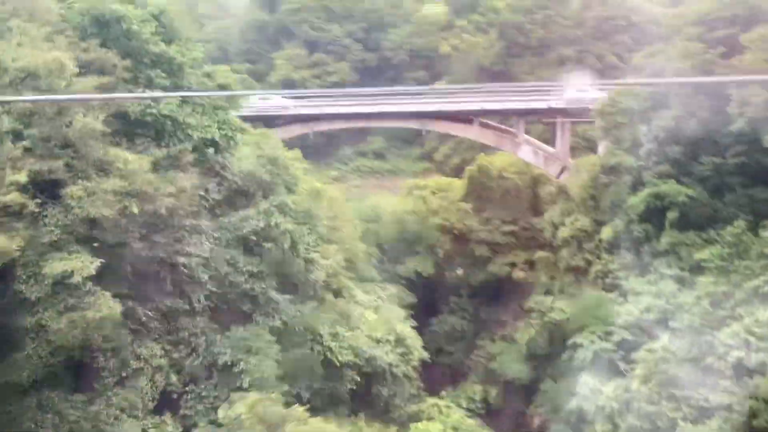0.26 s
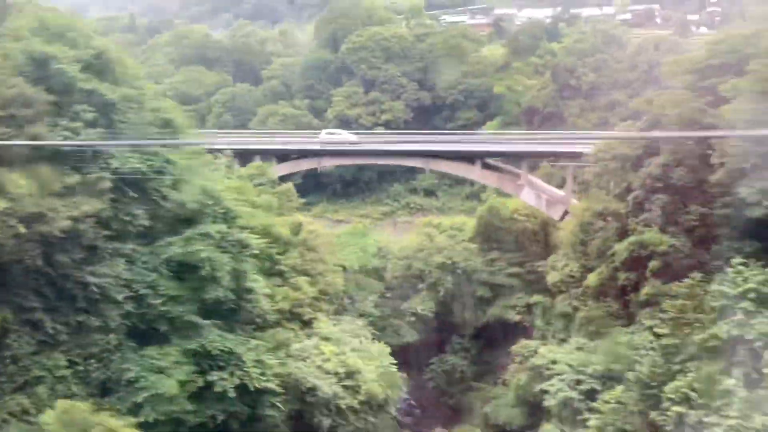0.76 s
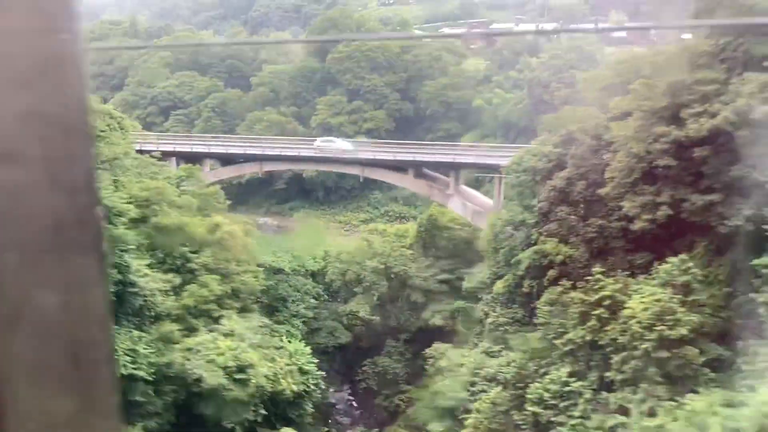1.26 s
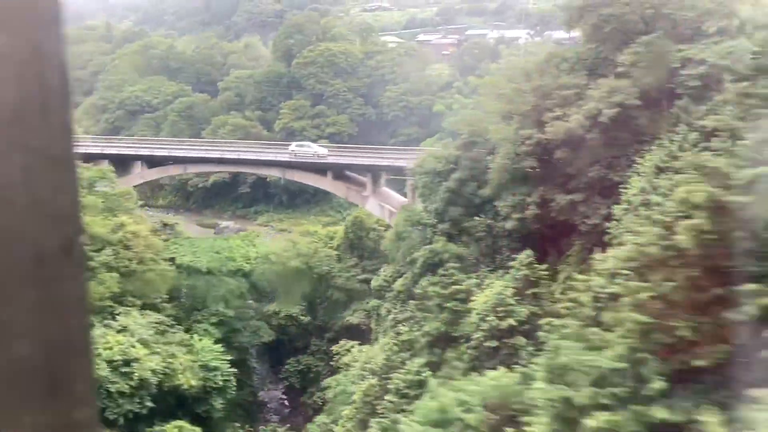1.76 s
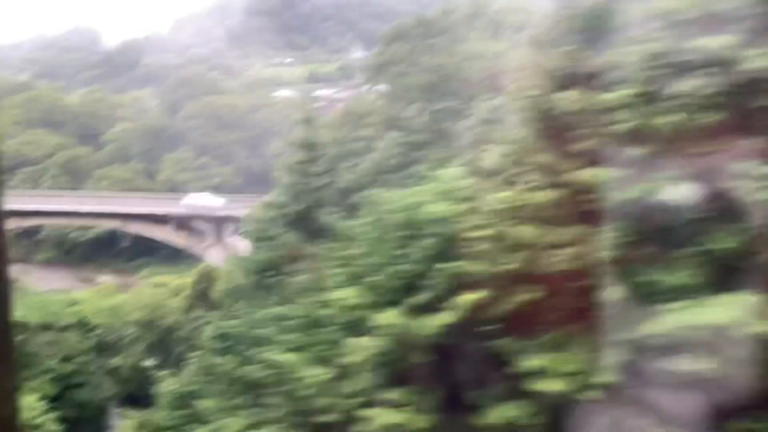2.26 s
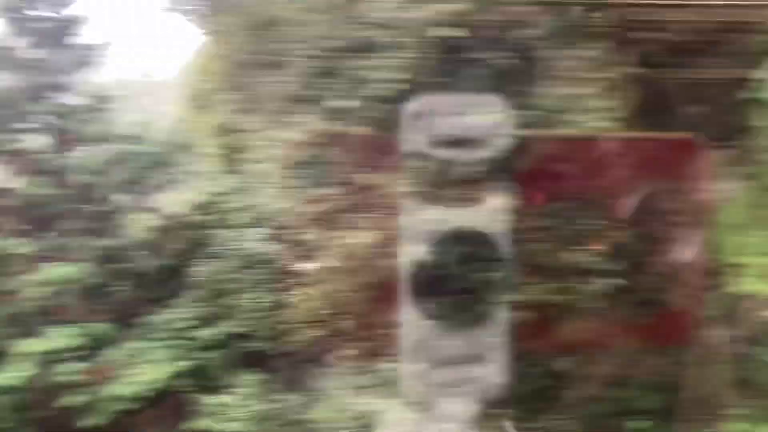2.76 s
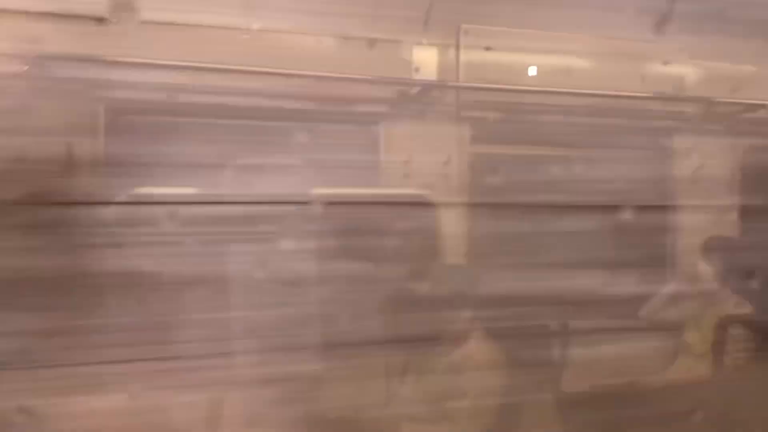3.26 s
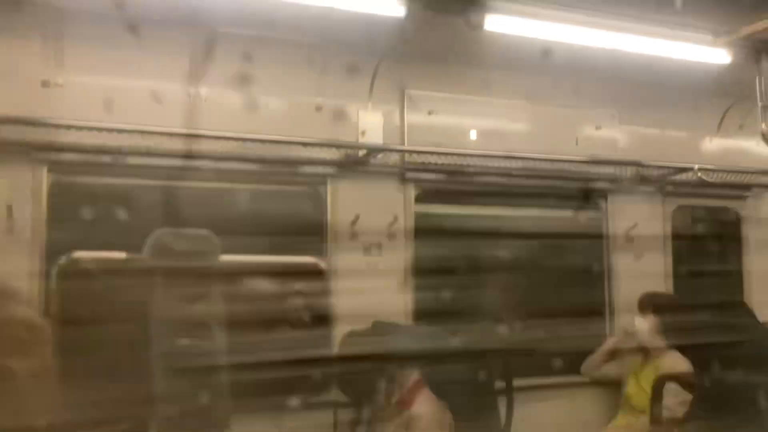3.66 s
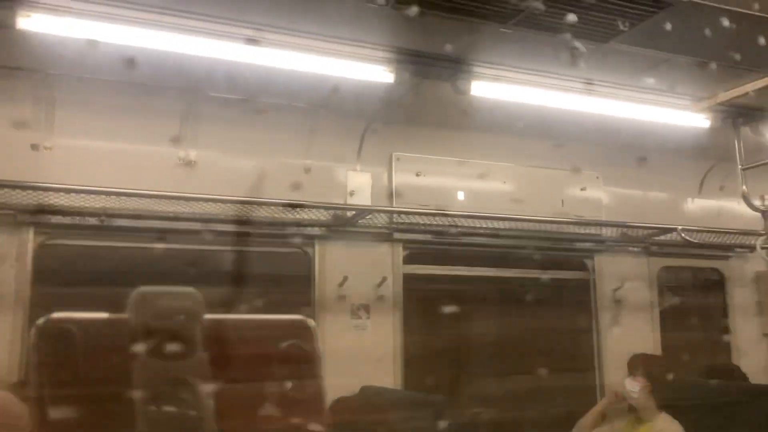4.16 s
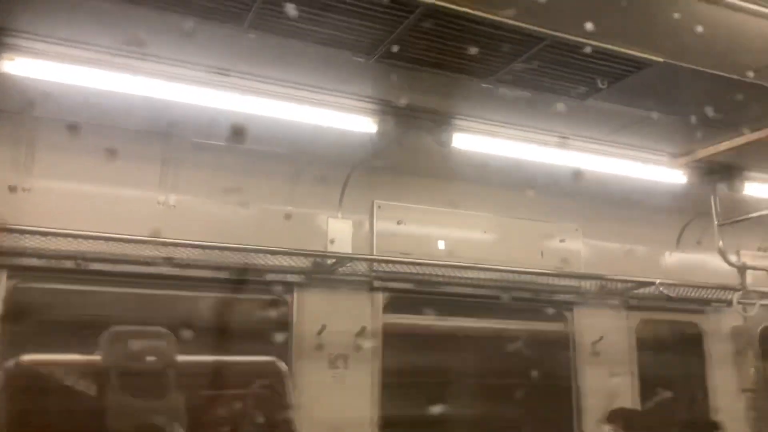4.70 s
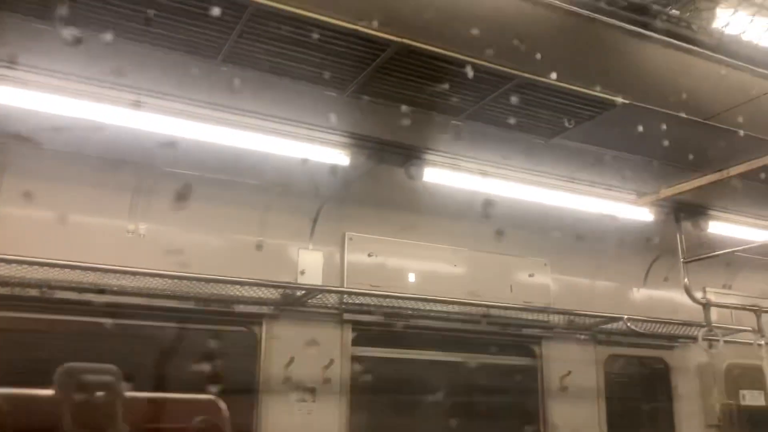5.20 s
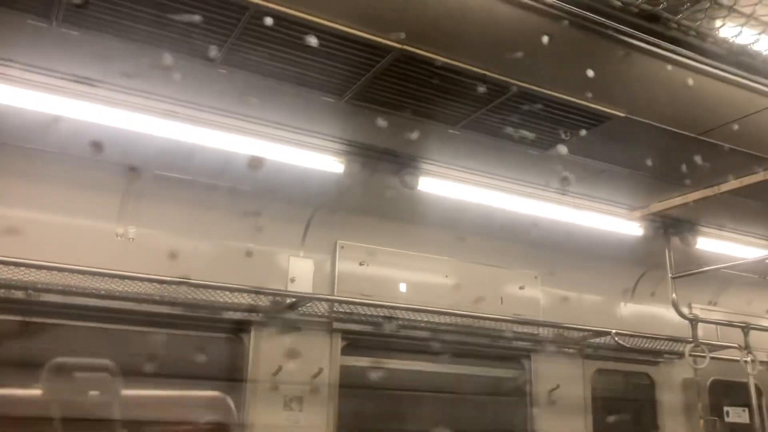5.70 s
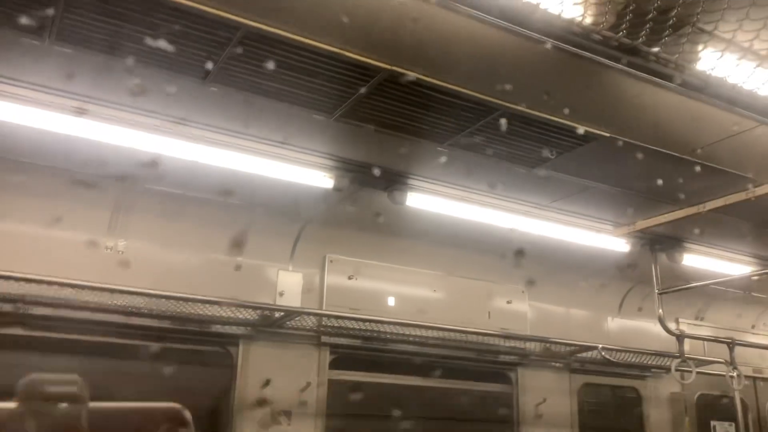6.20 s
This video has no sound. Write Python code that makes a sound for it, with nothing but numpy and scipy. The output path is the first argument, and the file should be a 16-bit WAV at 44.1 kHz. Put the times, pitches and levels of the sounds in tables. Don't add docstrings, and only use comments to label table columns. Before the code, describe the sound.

Inside a moving electric train, a deep rumbling floor and paired rail-joint thuds turn abruptly louder as a tunnel closes around the car.

```python
import sys
import numpy as np
from scipy import signal
from scipy.fft import rfft, irfft, next_fast_len
from scipy.io import wavfile
from scipy.ndimage import uniform_filter1d

SR = 44100
rng = np.random.default_rng(int(sys.argv[2]) if len(sys.argv) > 2 else 0)


def invert_db(level):
    return 10 ** (np.asarray(level, dtype=float) / 20)


def waveform_to_disk(signal):
    frames = np.transpose(np.atleast_2d(signal))
    scaled = np.clip(frames, -1, 1) * 32767
    samples = np.round(scaled).astype(np.int16)
    wavfile.write(sys.argv[1], SR, samples)


N = 284004
STEP = 32
CONTROL_S = np.arange(0, N + STEP, STEP) / SR


def rms_one(x):
    return x / np.sqrt(np.mean(x ** 2) + 1e-20)


def at_hz(points, hz):
    point_hz, values = np.array(points)[:, :2].T
    return np.interp(np.log(hz), np.log(point_hz), values)


def full(control):
    return np.interp(np.arange(N) / STEP, np.arange(len(control)), control)


def drift(rate_hz):
    r = np.exp(-2 * np.pi * STEP * rate_hz / SR)
    chance = rng.standard_normal(len(CONTROL_S) + 2000)
    return rms_one(signal.lfilter([1], [1, -2 * r, r * r], chance)[2000:])


def resonate(x, hz, width_hz):
    r = np.exp(-np.pi * width_hz / SR)
    poles = [1, -2 * r * np.cos(2 * np.pi * hz / SR), r * r]
    return signal.lfilter(np.array([1, 0, -1]) * (1 - r * r) / 2, poles, x)


def swell(t, rise, t60):
    shape = (1 - np.exp(-t / max(rise, 1e-4))) * invert_db(-60 * t / max(t60, 0.005))
    return shape / shape.max()


def bell(t, rise, sharp):
    return (t / rise * np.exp(1 - t / rise)) ** sharp


def add(track, start, piece):
    i = round(start)
    track[..., i:i + piece.shape[-1]] += piece[..., :track.shape[-1] - i]


def sides(pan_db):
    return invert_db(np.array([[pan_db / 2], [-pan_db / 2]]))


def evened(x, span_s):
    power = uniform_filter1d(np.mean(np.atleast_2d(x) ** 2, axis=0), size=int(span_s * SR))
    return x * np.sqrt(np.mean(power) / (power + 0.087 * np.mean(power)))


# time in seconds, force level in dB.
WHEEL_FORCE = [(0.0, -34.5), (0.7, -37.5), (0.8, -34.5), (1.36, -35.5), (1.63, -34.5), (2.05, -34.5),
               (2.26, -36.5), (2.32, -29.5), (2.66, -35.5), (2.8, -33), (2.97, -24), (3.09, -27),
               (3.25, -28.5), (3.7, -26), (4.5, -25.5), (4.68, -33), (5.3, -30), (6.44, -34)]


def force_db():
    mean_db = -33
    return np.interp(CONTROL_S, *np.transpose(WHEEL_FORCE)) - mean_db


def enclosed():
    portal_s, portal_width_s = 2.94, 0.11
    return (1 + np.tanh((CONTROL_S - portal_s) / portal_width_s)) / 2


# time of the top in seconds, peak in dB, fall in seconds per 10 dB.
BUMPS = [(0.0, -13.5, 0.11), (0.3, -21, 0.09), (0.52, -24.5, 0.5), (0.43, -31, -0.35), (0.77, -17, -0.03),
         (0.93, -20.5, 0.16), (1.05, -15.5, 0.06), (1.36, -21.5, 0.22), (1.61, -18.5, 0.21),
         (1.789, -17, -0.08), (2.04, -17.5, 0.13), (2.16, -33, -0.8), (2.32, -32, -0.6), (2.5, -19.5, .06),
         (1.92, -23, -0.07), (2.89, -24, 0.65), (3.0, -8, 0.07), (3.14, -18.5, 0.6), (3.55, -19.5, 0.61),
         (3.77, -22, 0.43), (4.05, -22.5, 0.47), (4.21, -20, 0.17), (4.34, -24.5, 0.24), (4.86, -24, 0.4),
         (4.98, -33, 0.7), (5.07, -35, 1), (5.36, -23.5, .09), (5.57, -20.5, 0.08), (5.88, -16, -0.23),
         (6.17, -26.5, .13)]


def bump_power():
    rise_share = 0.51
    top_s, peak_db, fall_s = np.transpose(BUMPS)[:, :, None]
    since = CONTROL_S - top_s
    away = np.maximum(since, -since / rise_share)
    return np.sum(invert_db(peak_db - 10 * away / np.maximum(fall_s, 0.01)) ** 2, axis=0)


def singing(modes, level_db, wander_db):
    noise = rng.standard_normal((2, N))
    noise = noise + 0.38 * np.array([noise[0], np.roll(noise[0], 12)])
    song = 0
    for hz, width_hz, db in modes:
        ring = resonate(resonate(noise, hz, 1.3 * width_hz), hz, 1.3 * width_hz)
        song = song + full(invert_db(db + wander_db * drift(2))) * ring
    return full(invert_db(level_db)) * rms_one(song)


# pitch in Hz, width in Hz, level in dB.
BODY_DRONE = [(375, 190, 1), (717, 83, 10), (2320, 500, -12)]


def body_drone():
    level_db = -42.5 - 21 * enclosed() + 0.13 * force_db()
    return singing(BODY_DRONE, level_db, wander_db=2.0)


# pitch in Hz, width in Hz, level in dB.
TRACK_SONG = [(478, 34, 14.5), (865, 170, 3.5), (1139, 81, 7.5), (1471, 88, 4), (1965, 63, 2),
              (2037, 120, 0.5), (2633, 54, -6), (2813, 56, 2), (3470, 140, -28), (3730, 59, -5),
              (3950, 130, -8.5), (4810, 360, -12)]


def track_song():
    level_db = -36 - 11.5 * (1 - enclosed()) + 0.17 * force_db()
    return singing(TRACK_SONG, level_db, wander_db=1.44)


# pitch in Hz, width in Hz, level in dB.
FLOOR_PANEL = [(53.6, 10.5, 2), (73.7, 13.8, 3.5), (129, 21, -7.5), (192, 26, -14.5)]


def floor_boom():
    shake, boom = rng.standard_normal(N), 0
    for k, (hz, width_hz, db) in enumerate(FLOOR_PANEL):
        boom = boom + (-1) ** k * invert_db(db) * resonate(shake, hz, width_hz)
    boom = signal.sosfilt(signal.butter(2, 42, "high", fs=SR, output="sos"), boom)
    steady = invert_db(-33 + 0.66 * force_db() + 5 * enclosed())
    level = np.sqrt(steady ** 2 + bump_power())
    return full(level) * rms_one(evened(boom, 0.0544)) * sides(-1.5)


# pitch in Hz, share of the force's swing, offset in the open in dB,
# offset in the tunnel in dB, gain of bumps in dB.
ROLL_ZONES = [(148, 0.67, 0.5, -3.5, 22), (430, 0.63, 0.5, -1, 7.5), (1780, 0.84, -2, 0, 0),
              (6000, 0.42, -2.5, 1, -8), (11000, 0.73, -3.5, 0.5, -4), (15000, 1.6, -1, -2, -6)]


def roll_zones():
    zones = []
    for _, follows, open_db, tunnel_db, bump_db in ROLL_ZONES:
        steady_db = follows * force_db() + open_db + (tunnel_db - open_db) * enclosed()
        power = invert_db(steady_db) ** 2 + invert_db(bump_db) ** 2 * bump_power()
        zones.append(10 * np.log10(power))
    return np.array(zones)


# start in seconds, peak in dB, thud against the peak in dB, hiss against the peak in dB,
# time to die by 60 dB in seconds.
JOINTS = [(0.002, -25, 2, -20.5, 0.37), (0.145, -35.5, 12.5, -14, 0.5), (0.704, -35.5, 16, -31, 0.59),
          (0.975, -36, 16, -30, .5), (1.418, -22.5, 6.5, -24, 0.57), (1.543, -22, 4, -21.5, 0.54),
          (1.63, -36, 2, -10, .4), (2.303, -34.5, 15, -29, 0.27), (2.38, -39, 2, -12, 1),
          (2.974, -29.5, 17, -13, .3), (2.995, -16, 3, -20.5, 0.61), (3.115, -14, 4, -16, 0.73),
          (3.386, -26, 10.5, -20, 0.41), (3.609, -26, 3, -15.5, 0.41), (3.851, -17, 4, -19, 1),
          (3.991, -19, 5, -18.5, 0.52), (4.14, -25.5, 10.5, -45.5, 0.58), (4.266, -17.5, -0.5, -25, 0.31),
          (4.312, -19.5, -2, -26, 0.28), (4.41, -31.5, 13, -24, 1), (4.513, -27.5, 7, -28, 0.13)]


def joint_power(hz, rise=0.0096):
    power, t = np.zeros(len(CONTROL_S)), np.arange(0, SR // 2, STEP) / SR
    for s, db, thud_db, hiss_db, t60 in JOINTS:
        tilt_db = at_hz([(250, thud_db - 11.5), (1500, 0), (6000, hiss_db + 15.0)], hz)
        shape = swell(t, rise * (1500 / hz) ** 0.15, t60 * (1500 / hz) ** 0.0098)
        crack = invert_db(-1.0) * swell(t, 0.00058, 0.03) * (hz > 300)
        add(power, s * SR / STEP, invert_db(db + tilt_db) ** 2 * (shape ** 2 + crack ** 2))
    return power


# pitch in Hz, level in dB per Hz.
ROLL_COLOUR = [(22, -20), (35, -21), (50, -6), (70, -11.5), (100, -9.5), (245, -16.5), (420, -18.5),
               (800, -28.5), (1480, -36), (2310, -37), (3910, -44.5), (7000, -57), (10000, -58),
               (16000, -76)]
# pitch in Hz, level in dB per Hz.
JOINT_COLOUR = [(35, -28), (60, -2), (207, 1), (842, -16), (1200, -20.5), (4640, -34.5), (8000, -44),
                (11500, -39.5), (16000, -72)]
# pitch in Hz, likeness from -1 to 1.
LIKENESS = [(60, 0.86), (130, 0.77), (290, 0.7), (640, -0.34), (1410, -0.23), (3100, 0.058), (6820, -0.23),
            (15000, -0.56)]
# pitch in Hz, left over right in dB.
LEAN = [(60, -4), (110, 0), (200, -1), (380, 1.5), (700, 0.5), (1290, 0), (2380, 1), (4400, 0), (8120, -6),
        (15000, 0.5)]


def running_noise():
    patchy_db = 1.3
    out, edges = 0, 22 * 2 ** (np.arange(30) / 3)
    zones = roll_zones()
    zone_hz = np.array(ROLL_ZONES)[:, 0]
    white, together, near = rng.standard_normal((2, 2, N + 9000)), drift(4.7), drift(12)
    chatter = invert_db(2.9 * drift(45))
    for k, (low, high) in enumerate(zip(edges, edges[1:])):
        band = signal.butter(2, [low, high], "band", fs=SR, output="sos")
        mid, side = signal.sosfilt(band, white[k % 2])[:, 9000:]
        hz = np.sqrt(low * high)
        place = np.interp(np.log(hz), np.log(zone_hz), np.arange(len(zones)))
        below = min(int(place), len(zones) - 2)
        level_db = zones[below] + (place - below) * (zones[below + 1] - zones[below])
        rolling = invert_db(level_db + at_hz(ROLL_COLOUR, hz) + 2.5)
        blow_db = at_hz(JOINT_COLOUR, hz) - at_hz(JOINT_COLOUR, 1330) + 2
        blows = joint_power(hz) * chatter ** min(hz / 600, 1) * invert_db(blow_db) ** 2
        near = 0.83 * near + 0.56 * drift(8.7)
        flicker_db = patchy_db * (0.2 * together + near) + (5.0 * near - 1.0) * (hz > 14000)
        gain = full(np.sqrt(rolling ** 2 + blows) * invert_db(flicker_db))
        alike = np.clip(at_hz(LIKENESS, hz), -1, 1)
        pair = np.sqrt(1 + alike) * mid + np.sqrt(1 - alike) * side * [[1], [-1]]
        if hz < 500:
            pair = evened(pair, 14 / hz + 0.068)
        out = out + gain * sides(at_hz(LEAN, hz)) * pair
    return out


# start in seconds, peak in dB, pitch in Hz, left over right in dB, rise in seconds.
KNOCKS = [(1.418, -19.5, 420, -4, 0.0077), (2.992, -18, 622, 3, 0.0074), (3.114, -29, 540, -5, .008),
          (3.115, -23.5, 1196, -4, 0.018), (3.116, -24.5, 2050, -8, 0.0092), (3.378, -18.5, 609, -2, 0.007),
          (3.755, -22.5, 594, -2, 0.009), (3.384, -18.5, 339, 3, 0.0072), (3.76, -19, 330, 8, 0.0079),
          (3.851, -31.5, 1940, -4, .008), (4.259, -20, 818, 0, 0.0073), (4.262, -21, 1160, -2, 0.0072),
          (4.273, -23, 1470, 0, 0.007), (4.27, -34, 2000, -2, 0.016), (4.27, -29, 740, 0, 0.013),
          (4.262, -26.5, 589, 0, 0.025), (4.301, -34.5, 1477, 5, 0.031), (4.36, -43, 1900, 8, 0.014)]


def underframe_knocks():
    out, t = np.zeros((2, N)), np.arange(SR // 8) / SR
    for s, db, hz, pan_db, rise in KNOCKS:
        grit = rng.standard_normal((2, len(t)))
        swing = np.sin(2 * np.pi * hz * t + np.array([[0], [1.4]]))
        tone = swing + 0.32 * rms_one(resonate(grit, hz, 94))
        add(out, s * SR, invert_db(db) * tone * bell(t, rise, sharp=1.2) * sides(pan_db))
    return out


# start in seconds, peak in dB.
GLASS_TICKS = [
    (0.1092, -46),
    (4.6144, -40),
    (5.9055, -42.5),
]


def glass_ticks():
    out, t = np.zeros((2, N)), np.arange(SR // 12) / SR
    for s, db in GLASS_TICKS:
        grit = rng.standard_normal((2, len(t)))
        add(out, s * SR, invert_db(db + 3.0) * resonate(grit * swell(t, 0.0005, 0.03), 11000, 8000))
    return out


# start in seconds, peak in dB, bright edge against the peak in dB, left over right in dB.
RATTLES = [(0.3266, -39, -24, -0.5), (0.378, -27, -40, 1), (0.427, -39, -30, 1), (1.3294, -60, -31, 0),
           (1.3786, -36, -32, 1), (1.617, -27, -26, -1), (1.9805, -25.5, -25, -1),
           (2.0237, -22.5, -12.5, -3), (2.0757, -27, -33, -5), (2.115, -33.5, -33, -2),
           (2.821, -34.5, -28, 5), (2.8794, -25.5, -13, -3.5), (4.513, -26, -26, 2)]
# pitch in Hz, width in Hz, level
# in dB, delay in seconds.
FITTING = [(776, 270, -9, 0.00318), (1594, 730, -1.5, 0.00061), (2640, 560, 1, 0.00049),
           (3040, 540, 1, 0.00144), (3910, 700, -1, 0.00088), (5080, 1600, -9.5, .0025)]


def rattle():
    out, t = np.zeros((2, N)), np.arange(SR // 12) / SR
    for s, db, edge_db, pan_db in RATTLES:
        grit = rng.standard_normal((2, len(t)))
        grit = grit + 0.5 * grit[0]
        body = 0
        for k, (hz, width_hz, mode_db, delay) in enumerate(FITTING):
            since = np.maximum(t - delay, 0)
            swing = np.sin(2 * np.pi * hz * since + np.array([[0], [1.2]]))
            swing = swing * bell(since, 0.0019, sharp=0.49)
            rough = rms_one(resonate(grit, hz, width_hz)) * swell(since, 0.00063, 0.065)
            body = body + (-1) ** k * invert_db(mode_db) * (0.56 * swing + 0.98 * rough)
        edge = resonate(grit * swell(t, 0.0005, 0.024), 6200, 3300)
        tick = body / abs(body).max() + invert_db(edge_db) * edge / abs(edge).max()
        add(out, s * SR, invert_db(db + 4.5) * tick * sides(pan_db))
    return out


# start in seconds, peak in dB, pitch in Hz, left over right in dB, rise in seconds.
SQUEAKS = [(1.055, -34, 2310, 2, 0.014), (1.618, -30, 2320, 1, 0.0085), (1.744, -32.5, 2126, 2, 0.0086),
           (2.853, -27, 2310, 2, 0.0082), (3.411, -24, 2340, 4, 0.007), (3.428, -20, 2324, 0, 0.0086),
           (3.448, -24.5, 2305, 3, 0.0046), (3.462, -32, 2310, 0, 0.0083), (4.905, -31.5, 2235, 2, 0.02),
           (5.095, -32.5, 2286, -2, 0.0085), (5.654, -25, 2240, 7.5, 0.027)]


def squeak():
    out, t = np.zeros((2, N)), np.arange(SR // 6) / SR
    flutter = full(drift(70))
    for s, db, hz, pan_db, rise in SQUEAKS:
        phase = 2 * np.pi * hz * (t + 0.13 * t * (t - 2 * rise))
        lagged = phase + np.array([[0], [1.8]])
        grip = bell(t, rise, sharp=2.5)
        tone = np.sin(lagged) + invert_db(-12.0) * grip * np.sin(2 * lagged)
        add(out, s * SR, invert_db(db + 0.5) * grip * tone * sides(pan_db))
    return out * invert_db(2.1 * flutter)


# pitch in Hz, lag in half cycles.
PORT_LAG = [(4800, -1), (7250, 0), (9200, 1), (11350, 2), (13550, 3), (15450, 4)]


def ports(x, dead=0.093):
    size = next_fast_len(N + 4096)
    left, right = rfft(x, size)
    hz = np.arange(len(left)) * SR / size
    half = np.pi / 2 * np.interp(hz, *np.transpose(PORT_LAG))
    total, difference = np.cos(half), np.sin(half)
    total = total * np.clip((abs(total) - dead) / 0.037, 0, 1) * invert_db(-1.0 * (hz > 14000))
    difference = difference * np.clip((abs(difference) - 0.4 * dead) / 0.08, 0, 1)
    share = np.interp(hz, (5600, 8400), [0, np.pi / 2])
    lagged = left * np.array([total - 1j * difference, total + 1j * difference])
    both = np.cos(share) * np.array([left, right]) + np.sin(share) ** 2 * lagged
    cutoff_hz = 15780
    return irfft(both * (hz < cutoff_hz), size)[:, :N]


def scene():
    background = body_drone() + track_song() + floor_boom()
    ride = running_noise() + underframe_knocks()
    return background + ride + glass_ticks() + rattle() + squeak()


def band_limit(x):
    return signal.sosfilt(signal.butter(12, 17100, fs=SR, output="sos"), x)


def record(dry):
    top = 1.05
    rounded = top * np.tanh(dry / top)
    return band_limit(ports(rounded))


dry = scene()
out = record(dry)
waveform_to_disk(out)
```